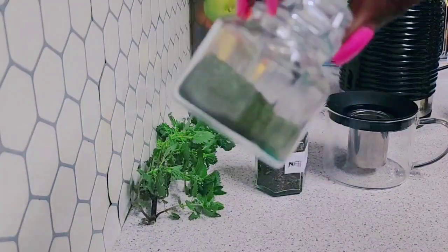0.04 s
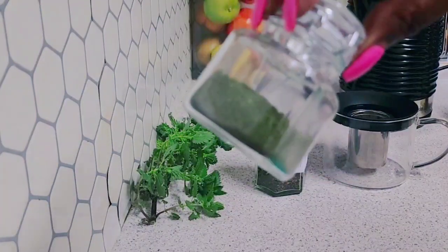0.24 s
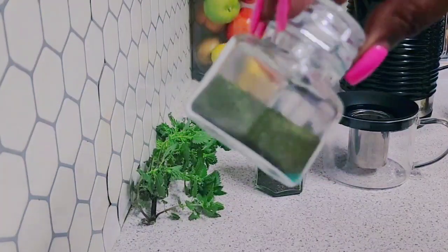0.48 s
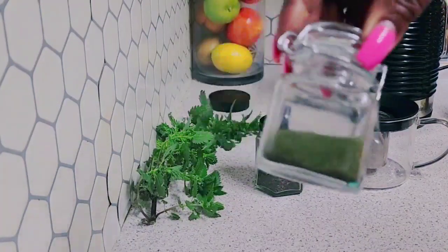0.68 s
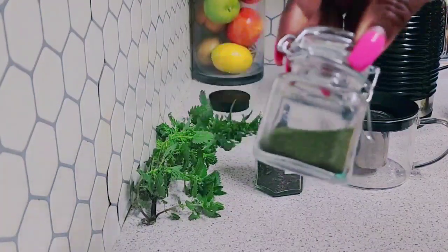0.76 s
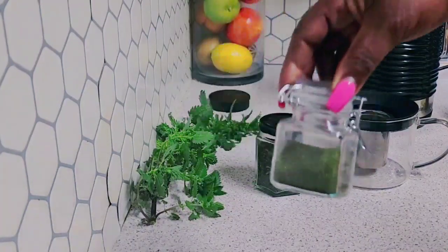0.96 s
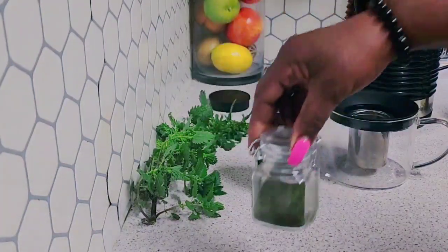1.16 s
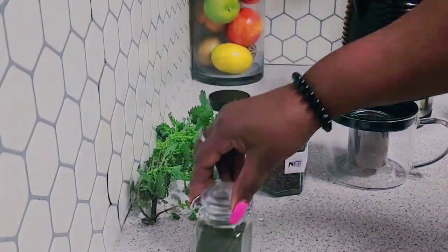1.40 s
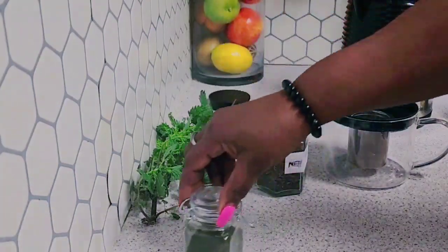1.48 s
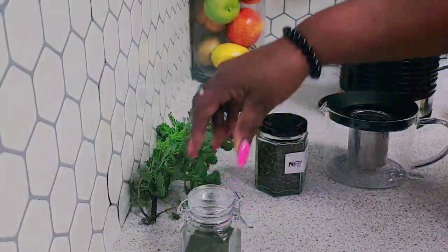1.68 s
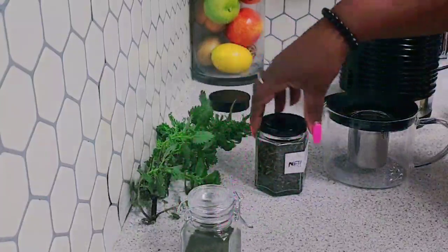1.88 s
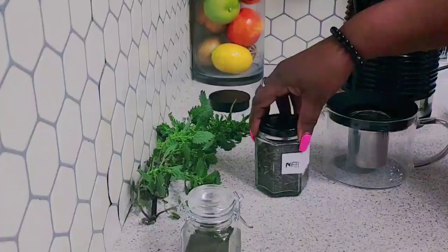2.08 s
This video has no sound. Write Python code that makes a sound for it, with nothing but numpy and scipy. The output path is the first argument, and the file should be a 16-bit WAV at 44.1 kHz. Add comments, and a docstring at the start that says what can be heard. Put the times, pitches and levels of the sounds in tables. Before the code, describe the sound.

One sharp knock of a glass spice jar on a counter, after faint handling bumps.

```python
"""A small glass spice jar is set down on a kitchen countertop, close by.
Its edge lands, then its base; jar and counter ring briefly between tiled walls.
The base slides a little, and the wire clasp ticks as the fingers let go.
Before that come soft bumps as the jar is carried, over a low room rumble and a faint hiss."""
import sys
import numpy as np
from scipy import signal
from scipy.fft import rfft, irfft, next_fast_len
from scipy.io import wavfile

SR = 44100
rng = np.random.default_rng(int(sys.argv[2]) if len(sys.argv) > 2 else 0)


def master_out(mix):
    """Clip the mix to full scale and print it as 16-bit PCM to the path in sys.argv[1]."""
    frames = np.transpose(np.atleast_2d(mix))
    ceiling = np.clip(frames, -1, 1)
    pcm = np.round(ceiling * 32767).astype(np.int16)
    wavfile.write(sys.argv[1], SR, pcm)


N = 94682
RING_SAMPLES = 32768


def jar():
    """Each knock gives a sharp crack, sets jar and counter ringing, and echoes off the walls."""
    # tones of jar and counter (pitch [Hz], level [dB], time to fade 60 dB [s], left over right [dB])
    tones = [(122.6, -10.5, 0.36, 0.5), (155.8, -6.5, 0.3, 0.5), (208, -6, 0.24, -0.5),
             (244.4, -1, .19, -1), (400.3, 3.5, 0.16, 4.5), (463.5, -2.5, .15, 3), (510.2, 1.5, 0.13, 2.5),
             (555, 0.5, .14, -0.5), (640, 1, 0.13, 1), (711, 1, .17, 2.5), (783.6, 9.5, 0.13, -3),
             (813, -0.5, .17, 2.5), (882.4, -2, 0.1, 0), (948.8, 7.5, 0.086, -5.5), (994.3, 7.5, .14, -1),
             (1342, -9.5, .15, 2), (1542, 3, .11, 1.5), (1768, 2, 0.17, 1.5), (1930, 7.5, .11, -6.5),
             (2277, -4, .14, -7), (2910, 1, .09, -2)]
    # dense ring of the counter and tiled corner, then the echo of the far kitchen, both as
    # (frequency [Hz], level [dB], time to fade 60 dB [s], left-right likeness [0-1], left over right [dB])
    corner = [(60, -19, .28, 0.98, 0), (150, -13.5, .2, 1, 0.5), (420, -1.5, 0.21, 0.7, -0.5),
              (955, -3, .12, 0, -1), (1800, -2, .12, 0.1, -1.5), (3200, -3, 0.12, 0.2, -3),
              (4400, -11.5, 0.12, 0.1, -4.5), (7930, -0.5, 0.13, .05, -4.5), (15100, -14, .15, 0.7, 1)]
    kitchen = [(100, -5.5, 0.96, 1, 3.5), (500, -3.5, 0.87, 0, 3.5), (1200, -14, 0.26, .1, 2),
               (4000, -4, .45, .1, 8), (15000, -4.5, .4, 0, -0.5)]
    tones_db, crack_db, corner_db, kitchen_db = -25.5, 17, 19, -7
    direct = sum(tone(hz, db + tones_db, fade_s) * sides(pan) for hz, db, fade_s, pan in tones)
    direct[:, 0] -= undb(crack_db)  # the crack is a single sample
    samples, right_delay_s = np.arange(RING_SAMPLES), .00008
    direct[1] = np.interp(samples + 1 - right_delay_s * SR, samples, np.append(0, direct[1, :-1]))
    response = direct + undb(corner_db) * echo(corner) + undb(kitchen_db) * echo(kitchen)
    low_cut = signal.butter(2, 85, "high", fs=SR, output="sos")  # a small jar gives little below 85 Hz
    force = signal.sosfilt(low_cut, contacts())
    return signal.fftconvolve(force[None], response, axes=1)[:, :N]


def contacts():
    """The jar gives the counter a short push at each touch; a longer push sounds duller."""
    # knocks of glass on the counter (time [s], level [dB], contact time [ms])
    knocks = [(1.7074, 0, 0.37), (1.7117, 4.5, 0.67), (1.7190, -8, 0.66), (1.735, -3, 1.04)]
    grit_db, sharp_ms = -31, 0.62  # a gritty edge, weaker in contacts longer than sharp_ms
    t, force = np.arange(N) / SR, np.zeros(N)
    for start, db, contact_ms in knocks:
        push = np.exp(-(2 * np.sqrt(np.pi) * (t - start) * 1000 / contact_ms) ** 2)
        force += undb(db) * push / push.sum()
        force[int(start * SR)] += undb(db + grit_db) * min(sharp_ms / contact_ms, 1)
    return force


def slide():
    """The glass base rubs softly on the counter until the jar is still."""
    # tone colour of the rubbing (frequency [Hz], level [dB])
    colour = [(300, 6), (450, -10), (680, 3), (850, -15.5), (1000, -5), (1250, -15), (1520, -6),
              (1720, 1.5), (2000, -1.5), (2300, -15), (2900, -17.5), (3500, -5), (4100, -17.5),
              (4650, -15.5), (5500, -29.5), (15000, -30.5)]
    # its rise and fall (time [s], level [dB])
    levels = [(1.75, -110), (1.80, -52.5), (1.845, -46.5), (1.875, -56), (1.94, -58.5), (1.99, -65.5),
              (2.05, -80.5), (2.09, -110)]
    return coloured_noise(colour, likeness=.3) * level_curve(levels)


def clasp():
    """The wire clasp gives small bright ticks as the fingers let go."""
    # ticks of the wire (time [s], level [dB], decay time [s])
    ticks = [(1.7704, -37, 0.011), (1.8396, -54.5, 0.027), (1.874, -63.5, 0.0045)]
    # their tone colour (frequency [Hz], level [dB])
    colour = [(300, -20), (1500, 16), (4300, -1), (5500, -2.5), (7500, 5.5), (10000, -7.5), (15000, 4)]
    loudness = sum(undb(db) * burst(start, decay_s, rise_s=0.0014) for start, db, decay_s in ticks)
    return coloured_noise(colour, likeness=0.067) * loudness


def brush():
    """A faint rub swells as the jar comes down."""
    # tone colour of the rub (frequency [Hz], level [dB])
    colour = [(200, 4), (1000, -10.5), (1600, -4), (2300, -3), (2700, -13), (3150, -1.5), (3900, -17.5),
              (4700, -12), (6000, -19.5), (15000, -26.5)]
    # its swell (time [s], level [dB])
    levels = [(1.52, -110), (1.57, -81), (1.62, -68), (1.675, -68), (1.70, -46.5), (1.72, -110)]
    return coloured_noise(colour, likeness=.3) * level_curve(levels)


def handling():
    """The hand carrying the jar makes dull bumps, each with a faint rustle."""
    # touches of the hand (time [s], bump level [dB], rustle level [dB], decay time [s])
    touches = [(0.971, -48.5, -73, 0.063), (1.041, -69, -67.5, 0.085), (1.092, -56, -86, 0.11),
               (1.174, -53.5, -64, 0.02), (1.282, -72, -73.5, .06)]
    # tone colours of bump and rustle (frequency [Hz], level [dB])
    bump_colour = [(40, -5.5), (90, 9.5), (170, -3), (295, 2), (390, -31), (490, -13), (600, -25.5),
                   (780, -19), (1100, -57), (2000, -50), (15000, -75)]
    rustle_colour = [(200, 18.5), (800, 5.5), (1500, 5), (4000, 2.5), (7500, -4), (10000, -10),
                     (15000, -21)]
    bump = coloured_noise(bump_colour, likeness=.95)
    rustle = coloured_noise(rustle_colour, likeness=0.3)
    return sum(burst(start, decay_s, rise_s=0.009) * (undb(bump_db) * bump + undb(rustle_db) * rustle)
               for start, bump_db, rustle_db, decay_s in touches)


def echo(bands):
    """Many reflections blur into fading noise; each half octave has its own level and fade time."""
    hz, ring = np.arange(RING_SAMPLES // 2 + 1) * SR / RING_SAMPLES, 0
    for centre in 62.5 * 2 ** np.arange(0, 8.1, .5):
        db, fade_s, likeness, pan = (over_hz(bands, centre, column) for column in range(1, 5))
        band = np.cos(np.pi / 2 * np.clip(2 * np.log2((hz + 1) / centre), -1, 1))
        noise = irfft(rfft(stereo_noise(likeness, RING_SAMPLES)) * band)
        ring = ring + noise * undb(db) * fade(fade_s) * sides(pan)
    ring = ring * (1 - np.exp(-np.arange(RING_SAMPLES) / SR / 0.001))  # builds up in about 1 ms
    return ring / np.sqrt(np.sum(ring ** 2) / 2)


def room_tone():
    """A low rumble, nearly the same on both sides, and a faint hiss."""
    # tone colours of rumble and hiss (frequency [Hz], level [dB])
    rumble_colour = [(20, -7.5), (45, -4), (70, -2.5), (97, -7), (130, -10.5), (160, -18), (220, -22),
                     (370, -31), (600, -50)]
    hiss_colour = [(400, 2.5), (700, -1), (1200, -6), (4000, -12), (7500, -12), (10000, -19.5),
                   (15500, -14)]
    # slow drift of the hiss (time [s], level [dB])
    hiss_levels = [(0, -69.5), (.25, -74), (.6, -76.5), (.9, -75), (1.3, -75), (2.1, -75.5)]
    rumble = undb(-58.5) * coloured_noise(rumble_colour, likeness=0.94)
    return rumble + level_curve(hiss_levels) * coloured_noise(hiss_colour, likeness=0.1)


def undb(db):
    """Turn decibels into a gain to multiply by."""
    return 10 ** (np.asarray(db) / 20)


def sides(db):
    """Left and right gains, with the left louder by db."""
    return undb(np.array([[db], [-db]]) / 2)


def level_curve(points):
    """Gain over time through (time [s], level [dB]) points."""
    return undb(np.interp(np.arange(N) / SR, *np.array(points).T))


def over_hz(table, hz, column=1):
    """Read a table column at any frequency, blending between rows on a pitch scale."""
    rows = np.array(table, float)
    return np.interp(np.log(np.maximum(hz, 1)), np.log(rows[:, 0]), rows[:, column])


def stereo_noise(likeness, size):
    """White noise whose two sides are unrelated (likeness 0) up to identical (1)."""
    shared = np.clip(likeness, 0, 1)
    middle = np.sqrt(shared) * rng.standard_normal(size)
    return middle + np.sqrt(1 - shared) * rng.standard_normal((2, size))


def coloured_noise(colour, likeness):
    """Stereo noise of strength 1 with the given tone colour, falling away beyond the table's ends."""
    size = next_fast_len(N, True)
    hz = np.arange(size // 2 + 1) * SR / size
    ends = 1 / (1 + (hz / colour[-1][0]) ** 8) / (1 + (colour[0][0] / (hz + 1)) ** 4)
    spectrum = rfft(stereo_noise(likeness, size)) * undb(over_hz(colour, hz)) * np.sqrt(ends)
    noise = irfft(spectrum, size)[:, :N]
    return noise / noise.std()


def burst(start, decay_s, rise_s):
    """A gain that rises quickly and dies away."""
    age = np.maximum(np.arange(N) / SR - start, 0)
    return np.minimum(age / rise_s, 1) * np.exp(-np.maximum(age - rise_s, 0) / decay_s)


def fade(fade_s):
    """A gain that falls by 60 dB in fade_s seconds."""
    return np.exp(-np.log(1000) * np.arange(RING_SAMPLES) / SR / fade_s)


def tone(hz, db, fade_s):
    """One fading pure tone of a struck object."""
    return undb(db) * fade(fade_s) * np.sin(2 * np.pi * hz * np.arange(RING_SAMPLES) / SR)


def scene():
    """The jar, its clasp, the hand and the room together."""
    return jar() + slide() + clasp() + brush() + handling() + room_tone()


def record(dry):
    """Round off the loudest peaks and cut the treble above 15500 Hz."""
    rounded = dry / (1 + dry ** 8) ** (1 / 8)
    return signal.sosfilt(signal.ellip(10, .2, 70, 15500, fs=SR, output="sos"), rounded)


dry = scene()
out = record(dry)
master_out(out)
```